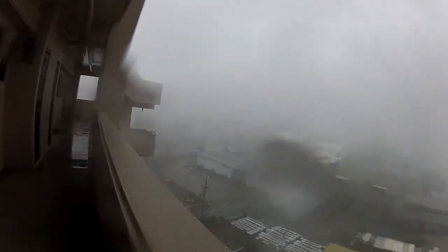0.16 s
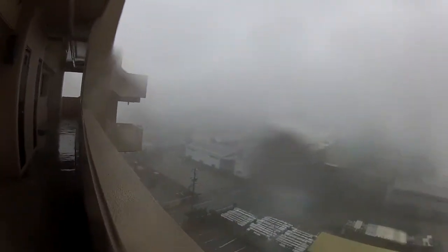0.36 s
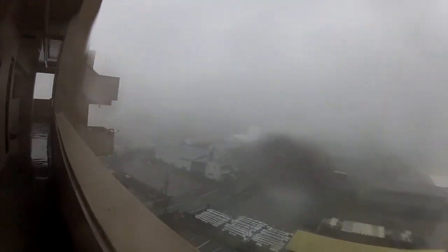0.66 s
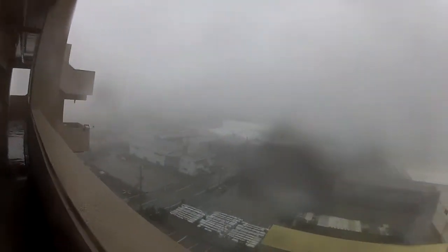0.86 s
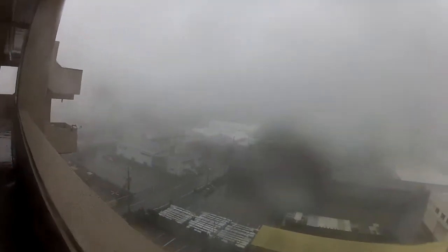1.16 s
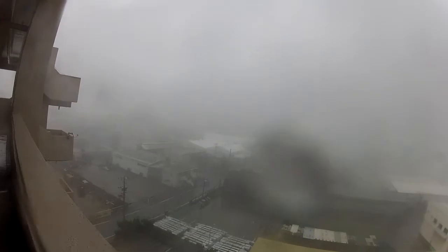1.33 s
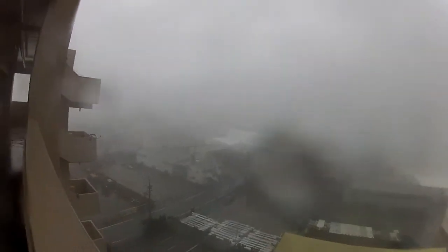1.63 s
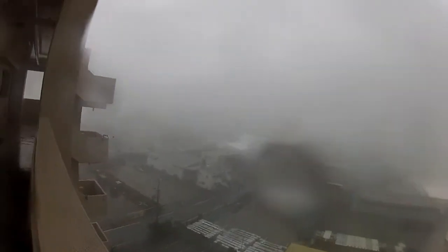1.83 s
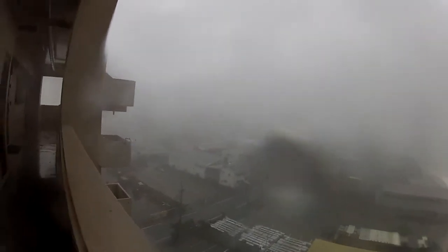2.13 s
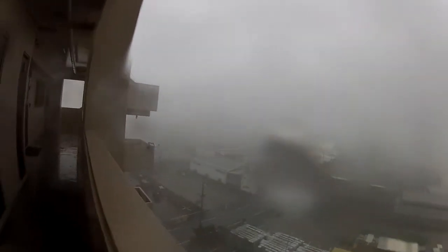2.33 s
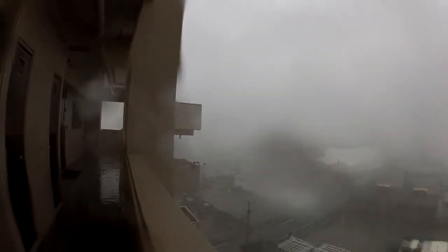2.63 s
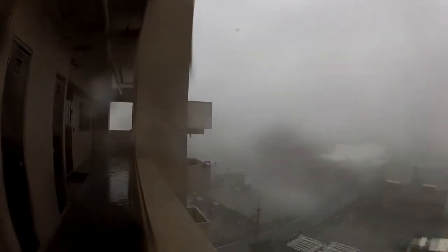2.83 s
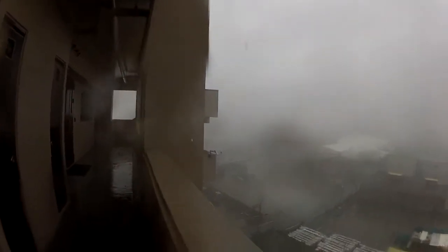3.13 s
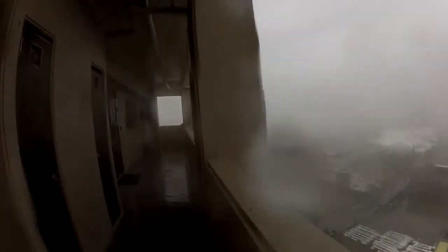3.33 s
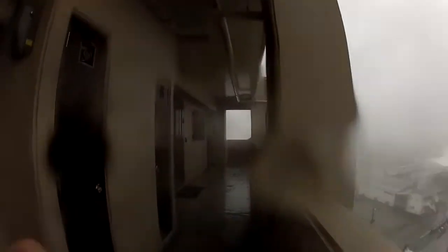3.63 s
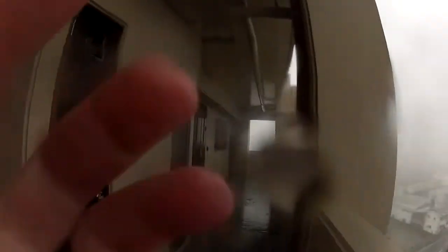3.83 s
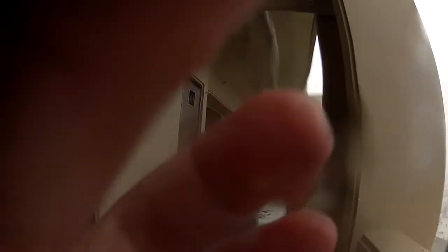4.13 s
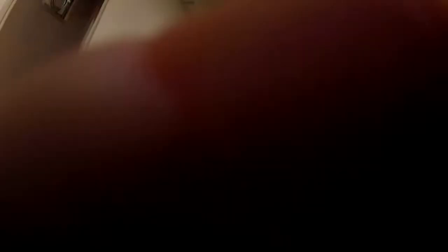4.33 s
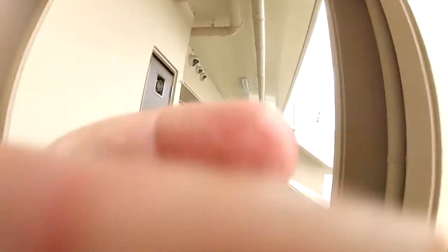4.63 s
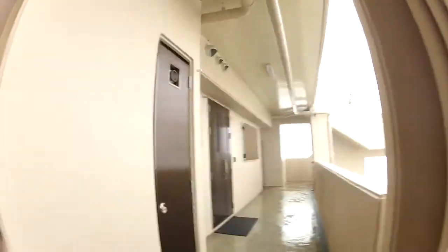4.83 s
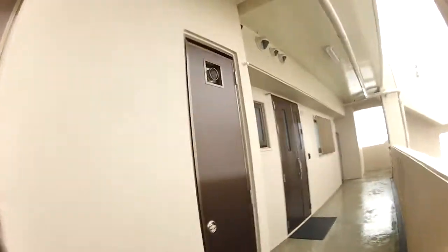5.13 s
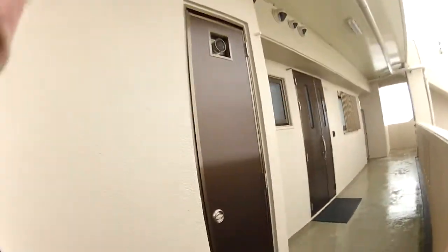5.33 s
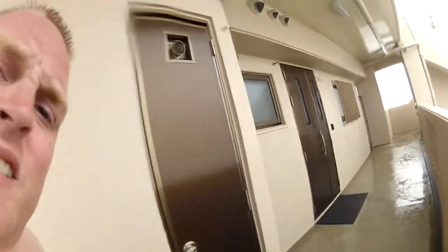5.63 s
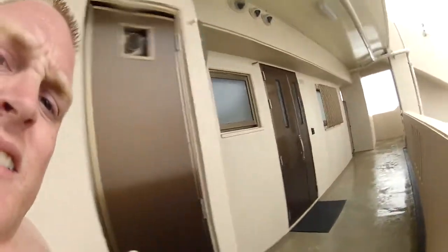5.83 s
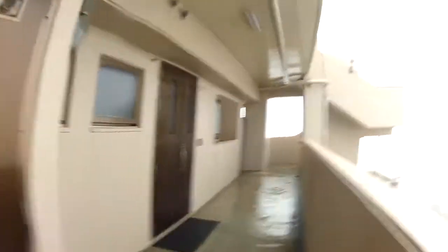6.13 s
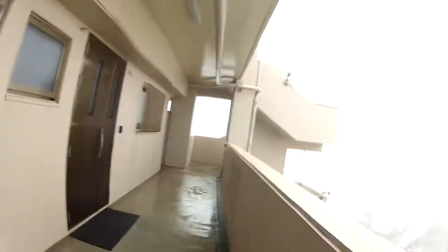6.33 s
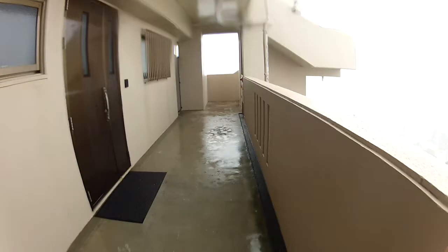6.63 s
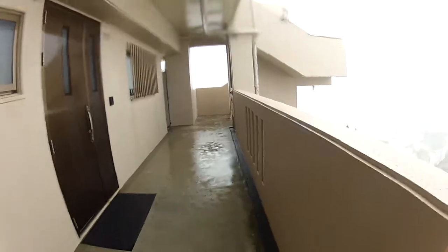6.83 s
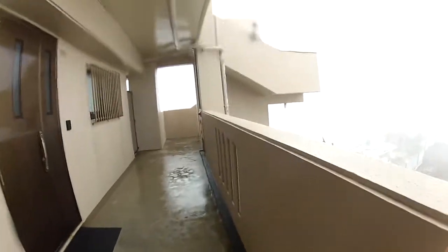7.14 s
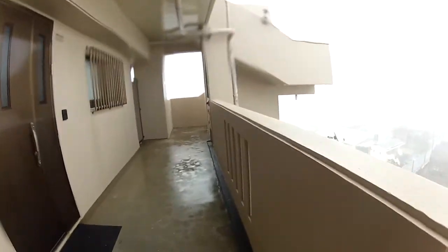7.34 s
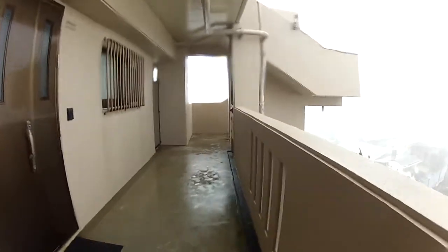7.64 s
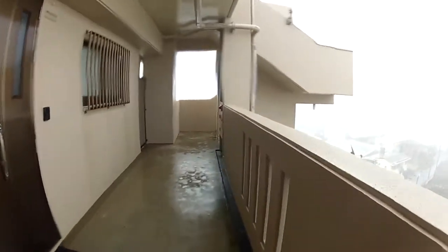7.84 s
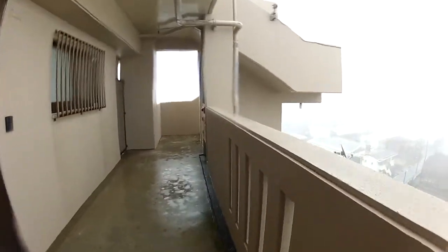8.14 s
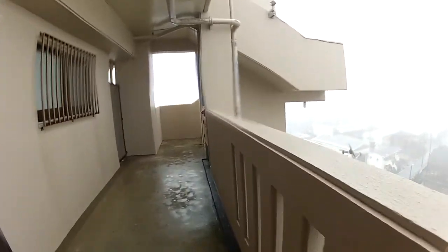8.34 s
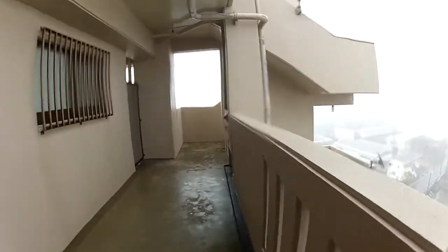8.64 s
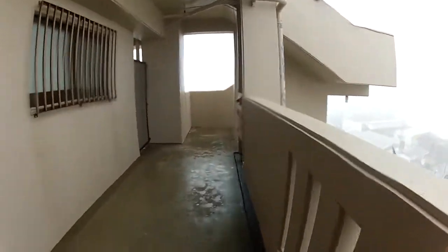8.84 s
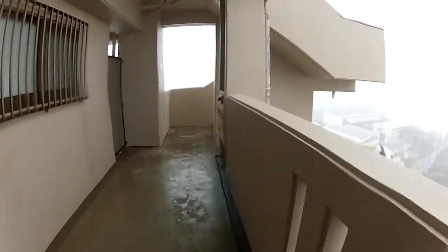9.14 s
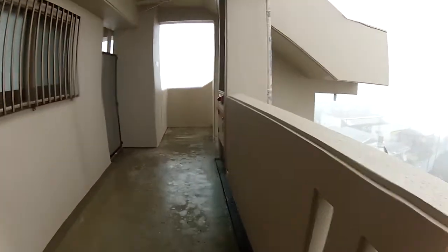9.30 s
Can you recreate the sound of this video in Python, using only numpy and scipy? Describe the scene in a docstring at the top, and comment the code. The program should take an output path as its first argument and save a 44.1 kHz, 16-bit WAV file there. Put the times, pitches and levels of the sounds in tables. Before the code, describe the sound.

Continuous storm wind and driven rain, close and coarse through a waterproof camera case, first facing out from a balcony, then turned into the walkway. A faint high whistle wavers throughout. Fingers strike the case with a loud double clack and, half a second later, a duller knock with tiny squeaks and scrapes. Stronger whistling gusts follow before the storm settles to a slightly weaker rush.

```python
"""Typhoon from an open walkway

Typhoon wind and driven rain, as shaped noise, rush past a small camera in a waterproof case. Vortices at
edges of the building whistle, as wavering narrow bands of noise. A hand knocks, squeaks and scrapes on
the wet case and drops tick on it, as ringing modes and gliding tones. The camera samples slowly, and
holding each sample adds a glassy fizz of mirrored treble."""
import sys
import numpy as np
from scipy import signal
from scipy.fft import rfft, irfft, next_fast_len
from scipy.io import wavfile
from scipy.ndimage import uniform_filter1d

SR = 44100
rng = np.random.default_rng(int(sys.argv[2]) if len(sys.argv) > 2 else 0)


def store_pcm(level_fs):
    """Save levels as 16-bit WAV."""
    pcm = np.round(np.clip(level_fs, -1, 1) * 32767).astype(np.int16)
    wavfile.write(sys.argv[1], SR, np.atleast_2d(pcm).T)


N = 417627

# Spectra of the four layers of the storm as heard through the case.
# Each row: frequency in Hz, relative level in dB per Hz.
BUFFET_SPECTRUM = [(8, -14), (25, -3.5), (55, 1), (85, -6), (130, -16), (300, -41)]
ROAR_SPECTRUM = [(50, -39), (95, -1), (140, -0.5), (190, -1.5), (250, -1.5), (330, -5.5), (450, -9),
                 (570, -12.5), (720, -16.5), (870, -17), (1000, -18), (1300, -40)]
RUSH_SPECTRUM = [(700, -30), (900, -10.5), (1030, -2), (1130, 0), (1260, -.5), (1350, -7.5), (1460, -2),
                 (1600, -6.5), (1720, -10), (2000, -23.5)]
SPRAY_SPECTRUM = [(1500, -44), (1720, -12), (1900, -0.5), (2020, -1.5), (2200, -2), (2520, 1.5), (2700, 0),
                  (2900, -4.5), (3550, -2.5), (4350, -14.5), (4650, -12.5), (5050, -14.5), (5500, -20),
                  (6000, -23)]
# Moves of the camera: start in s, time taken in s.
DRAW_BACK = (1.45, 0.55)  # back from over the parapet
TURN_IN = (3.7, 0.45)  # into the walkway
# Carrying the camera through the draught swells the buffeting.
CARRY_START_S, CARRY_RISE_S, CARRY_FALL_S, CARRY_DB = 3.6, 0.52, 3.1, 5.4


def wind():
    """Turbulent flow noise: buffeting on the case, roar of the gale, rush past the walls, sheets of spray."""
    strength_db = gust()
    carried = ramp(CARRY_START_S, CARRY_RISE_S) - ramp(CARRY_START_S + CARRY_RISE_S, CARRY_FALL_S)
    leaning_out = 1 - ramp(*DRAW_BACK)
    facing_out = 1 - ramp(*TURN_IN)

    # each layer: level in dB, plus its own growth in dB per dB of wind
    buffet_db = -45.7 + 0.5 * strength_db + CARRY_DB * carried + 0.69 * flutter(rate_hz=2.2)
    roar_db = -41.5 + 0.3 * strength_db + 2 * leaning_out + 0.4 * flutter(rate_hz=3.0)
    rush_db = -44.5 + 0.6 * strength_db + 1.5 * facing_out + 0.19 * flutter(rate_hz=4.5)
    spray_db = -35.5 + 0.89 * strength_db

    buffet = gain_of(buffet_db) * turbulence(BUFFET_SPECTRUM, patchy_db=0.7, size=(8, 4))
    roar = gain_of(roar_db) * turbulence(ROAR_SPECTRUM, patchy_db=0.83, size=(8, 8))
    rush = gain_of(rush_db) * turbulence(RUSH_SPECTRUM, patchy_db=1.2, size=(20, 14))
    spray = gain_of(spray_db) * turbulence(SPRAY_SPECTRUM, patchy_db=0.47, size=(12, 16))
    shared_flutter = gain_of(0.27 * flutter(rate_hz=19))
    return buffet + roar + (rush + spray) * shared_flutter


# Strength of the wind, which drives every layer of the storm.
# Each row: time in seconds, strength in dB about its reference.
GUST_STRENGTH = [(0.0, 2.5), (0.2, 3.0), (0.45, 1.05), (1.08, 0.4), (1.42, 1.5), (1.9, -1), (2.9, -0.4),
                 (3.65, 1.1), (4.15, -0.35), (4.55, -0.3), (4.85, 1.65), (5.25, 0.8), (5.6, 3.5), (5.87, 3),
                 (6.1, 1.35), (6.65, 0.64), (7.7, -2.5), (9.47, -1.3)]


def gust():
    """Slow modulation by gusts: strength of the wind in dB at every sample, joined by straight lines."""
    time_s, strength_db = np.transpose(GUST_STRENGTH)
    return np.interp(np.arange(N) / SR, time_s, strength_db)


def ramp(start_s, length_s):
    """Linear crossfade: goes from zero to one during a move of the camera."""
    return np.clip((np.arange(N) / SR - start_s) / length_s, 0, 1)


def turbulence(spectrum, patchy_db, size):
    """Spectral shaping of noise whose level shifts in eddies, smoothed over size (frames, bins)."""
    frame, hop = 2048, 512  # samples
    bin_hz = np.fft.rfftfreq(frame, 1 / SR)
    real, imag, eddies = rng.standard_normal((3, N // hop + 5, len(bin_hz)))
    eddies = uniform_filter1d(eddies, size[0], axis=0)
    eddies = evened(uniform_filter1d(eddies, size[1], axis=1))

    # the colour is interpolated along log frequency
    row_hz, row_db = np.transpose(spectrum)
    colour_db = np.interp(np.log(bin_hz + 1), np.log(row_hz + 1), row_db)
    frames = (real + 1j * imag) * gain_of(colour_db + patchy_db * eddies)
    noise = signal.istft(frames.T, nperseg=frame, noverlap=frame - hop)[1]
    return evened(noise[:N])


# Louder whistles at edges of the building.
# Each row: time of the peak in seconds, length in seconds, level in dB, pitch in Hz, nominal width in Hz.
EDGE_WHISTLES = [(.56, 0.31, -42, 2820, 110), (1.403, .6, -45, 1654, 300), (4.426, .25, -48, 3000, 90),
                 (5.03, 0.2, -38, 3110, 80), (5.622, .42, -37.5, 3357, 150), (5.8, .3, -39, 3230, 120),
                 (5.75, 1.44, -42.5, 2484, 130), (6.25, .35, -42, 3150, 90), (6.572, .34, -39, 3120, 100),
                 (6.681, .45, -41.5, 1940, 170), (6.774, 0.33, -36.5, 3060, 101),
                 (7.089, 0.58, -40, 3120, 100)]
WHISTLE_BEND = 0.00803  # share by which the pitch sags at both ends of a whistle
# The faint whistle that never stops, from one edge outside and another in the walkway:
# pitch in Hz, rise in Hz per dB of wind, level in dB, nominal width in Hz.
OUTER_EDGE = (2900, 6, -47, 200)
INNER_EDGE = (3100, 58, -49.5, 152)


def edges():
    """Aeolian tones: a faint one follows the wind; louder ones swell and die in an arch of level and pitch."""
    strength_db, inside = gust(), ramp(*TURN_IN)
    hz, rise, db, width = (
        outer + (inner - outer) * inside for outer, inner in zip(OUTER_EDGE, INNER_EDGE))
    steady = whistle(hz + rise * strength_db, width, waver_hz=30.6, flicker_db=2.5)
    out = gain_of(db + strength_db) * steady  # grows 1 dB per dB of wind

    for peak_s, length_s, db, hz, width in EDGE_WHISTLES:
        arch = signal.windows.cosine(round(length_s * SR))
        bent_hz = hz * (1 - WHISTLE_BEND * (1 - arch))
        tone = whistle(bent_hz, width, waver_hz=22.9, flicker_db=0.7)
        add(out, peak_s - length_s / 2, gain_of(db) * arch * tone)
    return out


def whistle(hz, width_hz, waver_hz, flicker_db):
    """Vortex shedding at an edge: a narrow band of noise that wavers, and frays as it widens."""
    count = len(hz)
    narrow = flutter(55, count) + 1j * flutter(55, count)
    wide = flutter(260, count) + 1j * flutter(260, count)
    frayed = np.clip((width_hz - 90) / 330, 0, 1)
    band = np.sqrt(1 - frayed) * narrow + np.sqrt(frayed) * wide

    # a turning phase carries the band up to the pitch
    wavering_hz = hz + waver_hz * flutter(rate_hz=12.85, count=count)
    carrier = np.exp(2j * np.pi * np.cumsum(wavering_hz) / SR)
    flicker = gain_of(flicker_db * flutter(rate_hz=14, count=count))
    return flicker * (band * carrier).real


# Knocks of the hand on the case. Each row: start in seconds, peak level in dB, contact time in seconds,
# stiffness of the grip as a factor on the modes, direction (push 1 or release -1).
HAND_KNOCKS = [(3.977, -21.5, 0.0027, 0.34, -1), (4.3370, 1, 0.00052, 1.1, 1),
               (4.3456, 0, 0.00034, 1.1, -1), (4.3467, 0, 0.00042, 0.786, 1),
               (4.775, -14.5, 0.0009, 0.78, -1), (4.814, -3.5, 0.001, 0.56, -1),
               (6.213, -24, 0.0033, 0.44, 1), (8.885, -25, .0012, 0.96, 1)]
# Modes of the case under a blow of the hand, before the stiffness factor.
# Each row: frequency in Hz, level in dB, time to decay by 60 dB in seconds.
CASE_MODES = [(70.5, 2, 0.042), (175, 4.5, 0.016), (424, -17, 0.0071), (1130, -7.5, 0.0036),
              (1930, -6, 0.007)]


def knocks():
    """Impact excitation: dull pushes and releases of the hand ring the modes of the whole case."""
    out = np.zeros(N)
    for start_s, db, contact_s, stiffness, direction in HAND_KNOCKS:
        add(out, start_s, np.sign(direction) * gain_of(db) * blow(CASE_MODES, contact_s, stiffness))
    return out


def blow(modes, contact_s, stiffness):
    """Modal response to a short push, scaled to a peak of one; a longer contact gives a duller sound."""
    t = np.arange(SR // 10) / SR
    ring = np.zeros(len(t))
    for hz, db, t60_s in modes:
        # a stiffer grip raises the pitch and shortens the decay
        decay = gain_of(db - 60 * t * stiffness / t60_s)
        ring += decay * np.sin(2 * np.pi * hz * stiffness * t)
    push = t * np.exp(-t / contact_s)
    sound = signal.fftconvolve(push, np.diff(ring, prepend=0))[:len(t)]
    return sound / abs(sound).max()


# Wet fingers slipping on the plastic. Each row: start in seconds, length in seconds,
# level of the fundamental in dB, first pitch in Hz, last pitch in Hz.
FINGER_SQUEAKS = [(4.633, .009, -29, 2400, 2460), (4.661, 0.02, -18.5, 1920, 2100),
                  (4.68, 0.017, -24, 2100, 2550), (4.701, 0.0078, -35, 3200, 3650),
                  (4.8074, 0.013, -19, 2052, 1830)]


def squeaks(octave_db, jitter):
    """Stick-slip friction: skin slips some thousands of times a second in brief gliding tones."""
    out = np.zeros(N)
    unsteady = 1 + jitter * flutter(rate_hz=300)
    for start_s, length_s, db, first_hz, last_hz in FINGER_SQUEAKS:
        count = round(length_s * SR)
        glide_hz = np.linspace(first_hz, last_hz, count) * unsteady[round(start_s * SR):][:count]
        angle = 2 * np.pi * np.cumsum(glide_hz) / SR
        tone = np.sin(angle) + gain_of(octave_db) * np.sin(2 * angle)
        add(out, start_s, gain_of(db) * signal.windows.cosine(count) * tone)
    return out


# Fingers scraping over the case. Each row: start in seconds, length in seconds,
# level in dB of the strongest possible slip.
FINGER_SCRAPES = [(4.737, .06, -23.5), (4.804, .011, -17)]
# Modes of the thin wall of the case under a drop or a slipping finger, before the factor of the hit.
# Each row: frequency in Hz, level in dB, time to decay by 60 dB in seconds.
WALL_MODES = [(1300, -21, .004), (2260, -8, 0.011), (2240, 11.5, 0.0075), (3500, -2, .002),
              (4700, 5.5, 0.0031)]


def scrapes(count=14, wall_db=-3, spread_db=9):
    """Random micro-impacts: uneven slips of the skin, each a tiny blow on the case and its wall."""
    out = np.zeros(N)
    case = blow(CASE_MODES, contact_s=0.00007, stiffness=0.94)
    wall = blow(WALL_MODES, contact_s=0.00004, stiffness=0.874)
    slip = case + gain_of(wall_db) * wall
    for start_s, length_s, db in FINGER_SCRAPES:
        for when, weakness, side in rng.random((count, 3)):
            level = gain_of(db - spread_db * weakness)
            add(out, start_s + when * length_s, np.sign(side - 0.5) * level * slip)
    return out


# Drops striking the case. Each row: start in seconds, peak level in dB before the low cut,
# contact time in seconds, place of the hit as a factor on the modes.
RAIN_DROPS = [(2.0168, -5, 0.000063, 1.06), (3.625, -14.5, 0.000019, 0.9), (3.977, -9, 0.000041, 0.95)]


def drops(low_cut_hz=900):
    """Light impacts: dry ticks ring only the thin wall, as drops are too light to move the whole case."""
    ticks = np.zeros(N)
    for start_s, db, contact_s, place in RAIN_DROPS:
        add(ticks, start_s, gain_of(db) * blow(WALL_MODES, contact_s, place))
    low_cut = signal.butter(2, low_cut_hz, "high", fs=SR, output="sos")
    return signal.sosfilt(low_cut, ticks)


def flutter(rate_hz, count=N):
    """Band-limited random modulation: a wander of rms one, up to about the given rate."""
    size = next_fast_len(max(count, SR))
    hz = np.fft.rfftfreq(size, 1 / SR)
    response = hz / (hz + 1) / (1 + (hz / rate_hz) ** 4)
    wander = irfft(rfft(rng.standard_normal(size)) * response, size)
    return evened(wander)[:count]


def gain_of(db):
    """Logarithmic level: decibels to amplitude."""
    return 10 ** (np.asarray(db) / 20)


def evened(x):
    """Power normalization: scales to an rms of one."""
    return x / np.sqrt(np.mean(x ** 2) + 1e-20)


def add(mix, start_s, sound):
    """Superposition: mixes a sound in at a given time."""
    part = mix[round(start_s * SR):][:len(sound)]
    part += sound[:len(part)]


def scene():
    """Superposition of the storm outside and the touches of hand and rain on the case."""
    storm = wind() + edges()
    touches = knocks() + squeaks(octave_db=-13.5, jitter=0.024) + scrapes() + drops()
    return (storm + touches)[None]


CAMERA_HZ, OUTPUT_HZ = 12000, 48000  # sampling rate of the camera, rate at which its samples are held
EDGE_HZ = 15400  # upper limit of the mirrored treble


def record(dry):
    """Zero-order hold: the camera samples slowly, overloads, and mirrors sound into the treble."""
    sampled = np.clip(signal.resample_poly(dry, CAMERA_HZ, SR, axis=1), -1, 1)
    held = np.repeat(sampled, OUTPUT_HZ // CAMERA_HZ, axis=1)
    out = signal.resample_poly(held, SR, OUTPUT_HZ, axis=1)[:, :N]
    high_cut = signal.firwin(511, EDGE_HZ, window=("kaiser", 9), fs=SR)
    return signal.oaconvolve(out, high_cut[None], "same")


dry = scene()
out = record(dry)
store_pcm(out)
```